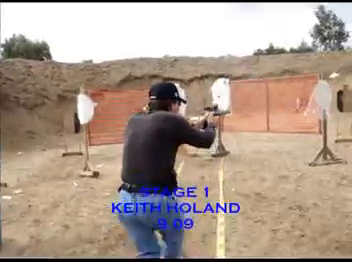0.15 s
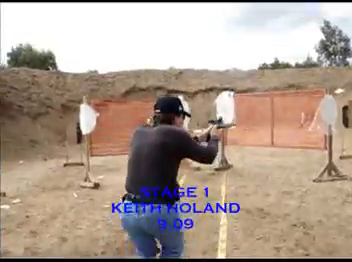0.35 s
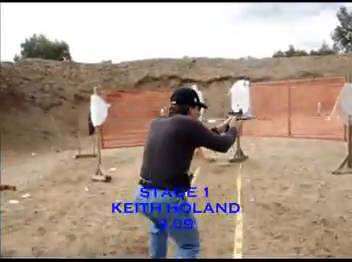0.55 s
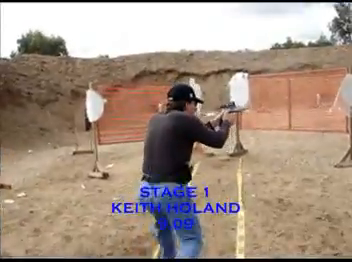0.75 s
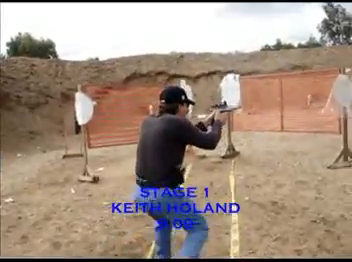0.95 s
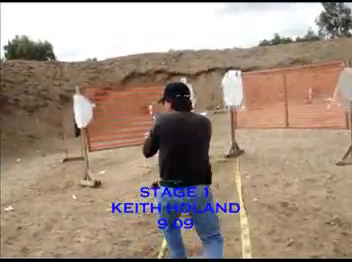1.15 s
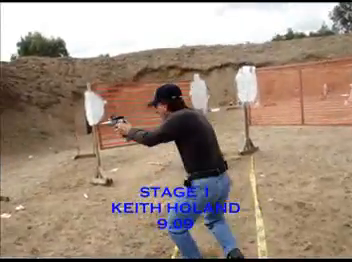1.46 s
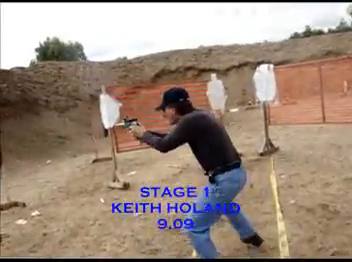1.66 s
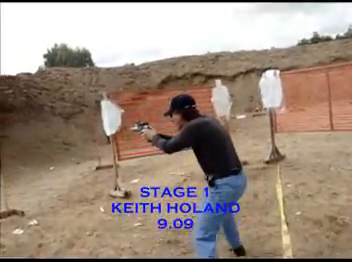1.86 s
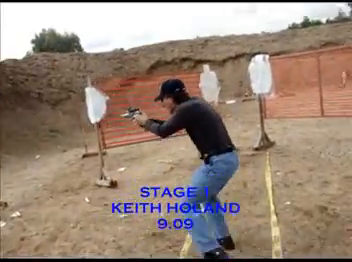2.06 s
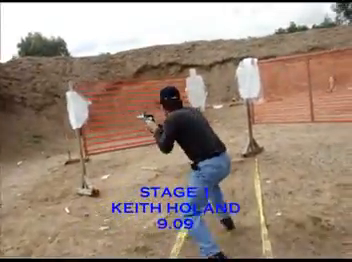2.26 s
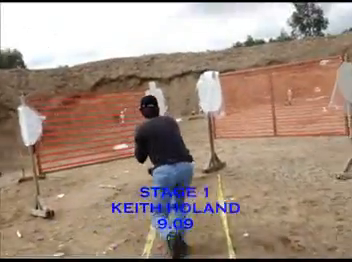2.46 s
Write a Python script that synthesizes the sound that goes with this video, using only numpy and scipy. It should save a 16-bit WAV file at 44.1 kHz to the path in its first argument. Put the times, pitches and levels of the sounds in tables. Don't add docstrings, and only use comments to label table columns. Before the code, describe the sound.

Pistol gunfire close to a small overloading camera microphone outdoors: three shots, a fourth alone, a quick pair, a dull distant shot, then two more, each with dense echoes off earth walls; faint gravel scuffs.

```python
import sys
import numpy as np
from scipy import signal
from scipy.fft import rfft, irfft
from scipy.io import wavfile
from scipy.ndimage import uniform_filter1d

SR = 44100
rng = np.random.default_rng(int(sys.argv[2]) if len(sys.argv) > 2 else 0)


def volts_from_db(level):
    exponent = np.asarray(level, float) / 20
    return 10 ** exponent


def bounce(signal):
    frames = np.transpose(np.atleast_2d(signal))
    limited = np.clip(frames, -1, 1)
    pcm = np.round(limited * 32767).astype(np.int16)
    wavfile.write(sys.argv[1], SR, pcm)


N = 114660


def unit(x):
    return x / np.sqrt(np.mean(x ** 2))


def along(table, hz):
    table_hz, values = np.array(table).T
    return np.interp(np.log(np.maximum(hz, 1)), np.log(table_hz), values)


def colour(x, spectrum):
    cepstrum = irfft(along(spectrum, np.arange(1025) * SR / 2048) * np.log(10) / 20)
    cepstrum[1:1024] *= 2
    cepstrum[1025:] = 0
    impulse = irfft(np.exp(rfft(cepstrum)))[:1024]
    return signal.fftconvolve(x, impulse)[:len(x)]


def band(x, hz, width_hz):
    return signal.lfilter(*signal.iirpeak(hz, hz / width_hz, fs=SR), x)


def noise_band(size, hz, width_hz):
    return unit(band(rng.standard_normal(size), hz, width_hz))


def sparks(rate_hz, scatter_db, size):
    chance, sign, strength = rng.random((3, size))
    clicks = (chance < rate_hz / SR) * np.sign(sign - .5)
    return unit(clicks * volts_from_db(-scatter_db * np.log(strength + 1e-9)))


def walk(rate_hz, size):
    hold = int(SR / rate_hz)
    levels = np.repeat(rng.standard_normal(size // hold + 1), hold)
    return unit(uniform_filter1d(levels, hold)[:size])


def add(out, x, s):
    i = int(s * SR)
    out[i:i + len(x)] += x[:N - i]


# f/Hz, level/dB per Hz
SWARM_SPECTRUM = [(35, -39), (60, -32), (355, -8), (544, 1), (853, 2), (2050, -7), (3360, -8), (7410, -19),
                  (10000, -32), (13000, -50), (22000, -120)]


def muzzle_blast(t):
    length_s = .0011
    pulse = colour((1 - 2 * t / length_s) * (t < length_s), SWARM_SPECTRUM)[:200]
    return volts_from_db(-13.5) * np.pad(unit(pulse), (0, len(t) - 200))


# f/Hz, t60/s
SWARM_FADE = [(100, 0.37), (400, 0.25), (1000, 0.26), (3000, 0.24), (9000, 0.28)]


def reflection_swarm(t, hold_s):
    raw = unit(colour(sparks(6000, 1.8, len(t)), SWARM_SPECTRUM))
    spectrum = rfft(raw)
    hz = np.arange(len(t) // 2 + 1) * SR / len(t)
    sag_db = -133.5 * np.minimum(t, hold_s)
    swarm = 0
    for centre_hz in 62.5 * 2. ** np.arange(9):
        share = np.clip(1 - abs(np.log2(np.maximum(hz, 62.5) / centre_hz)), 0, 1)
        fade_db = -60 * np.maximum(t - hold_s, 0) / along(SWARM_FADE, centre_hz)
        lumps_db = 3 * walk(149.5, len(t))
        swarm = swarm + irfft(spectrum * share, len(t)) * volts_from_db(sag_db + fade_db + lumps_db)
    return volts_from_db(-3) * swarm


def burst(t, start_s, db, t60_s):
    return (t >= start_s) * volts_from_db(db - 60 * np.maximum(t - start_s, 0) / t60_s)


# delay/s, level/dB
CRACKS = [
    (0, 0),
    (.0105, -5),
    (.0205, -6.5),
]


def cracks_and_slap(t, slap_s, wall_s, slap_db):
    envelope = burst(t, slap_s, slap_db, .015) + burst(t, wall_s, -9.5, .05)
    for delay_s, db in CRACKS:
        envelope = envelope + burst(t, delay_s, db, .022)
    return envelope * noise_band(len(t), 2800, 4000)


def late_wash(t):
    return noise_band(len(t), 920, 1300) * volts_from_db(-36 - 60 * t / .73)


# level/dB, swarm hold/s, slap level/dB
SHOT_LEVELS = [
    (-3, .04, -15.5),
    (-4, 0.033, -13.5),
    (-3.5, 0.02, -16),
    (-3.5, 0.028, -14.5),
    (-3.5, 0.019, -14.5),
    (-3.5, 0.017, -15),
    (-5, 0.016, -10),
    (-4, 0.016, -14.5),
]
# t/s, berm slap delay/s, side wall echo delay/s
SHOT_TIMES = [
    (.2279, .1098, .05),
    (.3946, .1085, .048),
    (.6314, .107, .048),
    (1.0168, .1065, .046),
    (1.6374, .1035, .0425),
    (1.7868, .102, .042),
    (2.0892, .0985, .039),
    (2.2673, .0985, .038),
]


def near_shots():
    out = np.zeros(N)
    t = np.arange(SR // 2) / SR
    for (s, slap_s, wall_s), (db, hold_s, slap_db) in zip(SHOT_TIMES, SHOT_LEVELS):
        shot = muzzle_blast(t) + reflection_swarm(t, hold_s)
        shot = shot + cracks_and_slap(t, slap_s, wall_s, slap_db) + late_wash(t)
        add(out, volts_from_db(db) * shot, s)
    return out


# f/Hz, level/dB, t60/s
FAR_RING = [
    (385, 0, .15),
    (950, -8, .05),
    (1400, -4, .012),
    (1900, -5, .008),
]


def far_shot():
    t = np.arange(SR // 2) / SR
    ring = sum(-volts_from_db(db - 60 * t / t60_s) * np.sin(2 * np.pi * hz * t) for hz, db, t60_s in FAR_RING)
    ring = ring * np.exp(-np.maximum(t - .0058, 0) / .002)
    ring = ring * np.minimum(t / .0002, 1)
    roll = unit(band(band(sparks(1000, 1, len(t)), 730, 700), 520, 600))
    roll = roll * np.minimum(t / .0027, 1)
    return volts_from_db(-14) * ring + roll * volts_from_db(-33 - 60 * t / .9 + 2.5 * walk(60, len(t)))


# f/Hz, width/Hz, level/dB
GRAVEL = [(380, 46, -10.5), (686, 40, -2.5), (1030, 350, -11)]
# t/s, length/s, level/dB
SCUFFS = [(0, 0.025, -63.5), (0.029, .025, -56), (0.085, 0.044, -52.5), (0.877, 0.033, -60.5),
          (0.92, 0.043, -55), (0.991, .015, -61), (1.405, 0.047, -50), (1.486, 0.061, -54),
          (1.537, 0.054, -50.5), (1.579, 0.03, -61.5), (2.534, 0.057, -53)]


def boots():
    t = np.arange(N) / SR
    grit = sparks(860, 4.3, N)
    grit = unit(sum(volts_from_db(db) * band(grit, hz, width_hz) for hz, width_hz, db in GRAVEL))
    swells = 0
    for s, length_s, db in SCUFFS:
        swells = swells + volts_from_db(db) * np.sin(np.pi * np.clip((t - s) / length_s, 0, 1)) ** 2.1
    return grit * swells


# f/Hz, level/dB per Hz
HISS_SPECTRUM = [(24, -38), (40, -3.5), (143, -19.5), (948, -10), (1610, -12), (1850, -12.5), (2030, -9.5),
                 (10000, -16.5), (13000, -57.5), (22000, -120)]


def hiss():
    return volts_from_db(-58 + 2.8 * walk(12, N)) * unit(colour(sparks(9000, 1, N), HISS_SPECTRUM))


def scene():
    out = near_shots()
    add(out, far_shot(), 1.9743)
    out = out + boots() + hiss()
    return np.array([out, out])


def smear():
    t = np.arange(N) / SR
    rise = 0
    for s, *_ in SHOT_TIMES:
        rise = rise + (t > s - .006) * (t < s) * volts_from_db(-18 - 5500 * abs(s - t))
    return rise * noise_band(N, 2500, 7500)


BLANK_LEADS = [
    .028,
    .009,
    .026,
    .016,
    .026,
    .034,
    .011,
    .011,
]


def coarse_blocks(x, size=128):
    n, k = np.arange(2 * size)[:, None], np.arange(size)
    window = np.sin(np.pi * (n + .5) / (2 * size))
    basis = window * np.cos(np.pi / size * (n + .5 + size / 2) * (k + .5)) * np.sqrt(2 / size)
    rows = np.pad(x, (size, 2 * size - N % size)).reshape(-1, size)
    c = np.hstack([rows[:-1], rows[1:]]) @ basis
    t, hz = np.arange(len(c)) * size / SR, k / size * SR / 2
    loud = np.sqrt(uniform_filter1d(np.mean(c ** 2, 1), size=3) + 1e-12)
    busy = (loud[:, None] > volts_from_db(-52)) & (loud[:, None] < volts_from_db(-9))

    blank = volts_from_db(-14)
    for (s, *_), lead_s in zip(SHOT_TIMES, BLANK_LEADS):
        loud = np.where((t > s - lead_s) & (t < s), np.maximum(loud, blank), loud)
    blanked = (loud == blank)[:, None] & (hz > 2000)

    patch = rng.standard_normal((len(c) // 2 + 1, 16)).repeat(2, 0).repeat(size // 16, 1)[:len(c)]
    together = rng.standard_normal((len(c) // 6 + 1, 1)).repeat(6, 0)[:len(c)]
    holes = (unit(patch + .7 * together) > .8) & (hz > 4800) & busy

    step = loud[:, None] * volts_from_db(-14)
    audible = abs(c) > .65 * step
    y = (np.round(c / step) * step * audible * ~holes * ~blanked) @ basis.T
    return (y[1:, :size] + y[:-1, size:]).ravel()[:N]


def low_pass(x):
    return signal.sosfilt(signal.butter(12, 14000, fs=SR, output="sos"), x)


def record(dry):
    bass_cut = signal.butter(2, 130.6, "high", fs=SR, output="sos")
    x = signal.sosfilt(bass_cut, dry[0])
    x = coarse_blocks(np.clip(x, -.82, .82)) + smear()
    x = signal.sosfilt(bass_cut, x) + volts_from_db(-82) * noise_band(N, 50, 71)
    top_cut = signal.ellip(10, .2, 60, 10150, fs=SR, output="sos")
    x = signal.sosfilt(top_cut, np.clip(x, -.84, .84))
    mirror_band = signal.ellip(6, .5, 60, (11100, 14000), "band", fs=SR, output="sos")
    x = x + volts_from_db(-37.5) * signal.sosfilt(mirror_band, x * (-1) ** np.arange(N))
    side = volts_from_db(-38.5) * band(x * rng.standard_normal(N), 1800, 1500)
    return low_pass(np.array([x + side, x - side]))


dry = scene()
out = record(dry)
bounce(out)
```